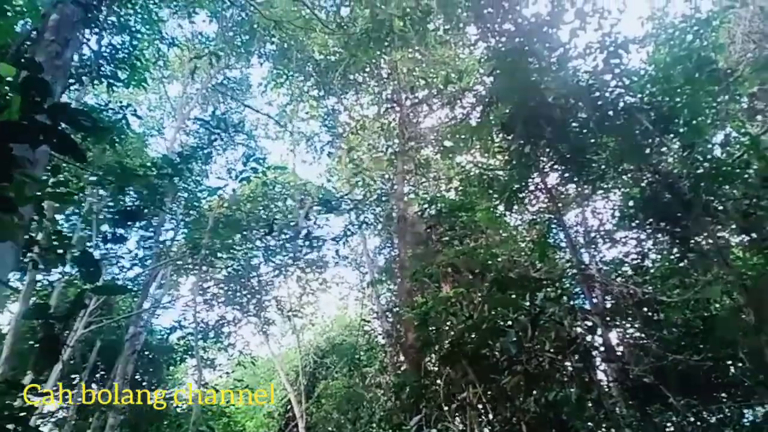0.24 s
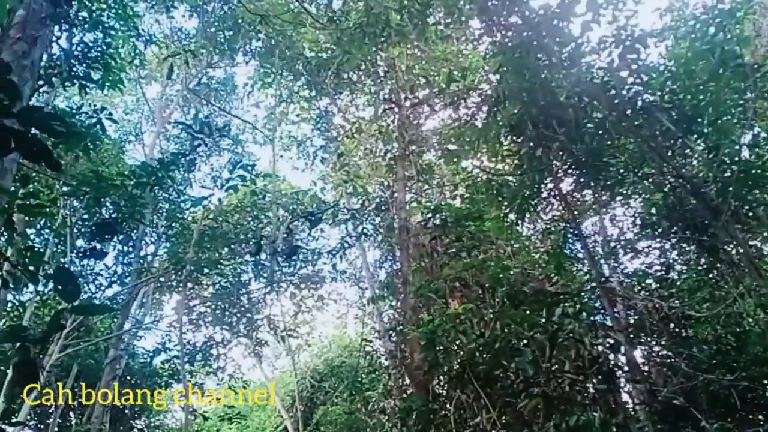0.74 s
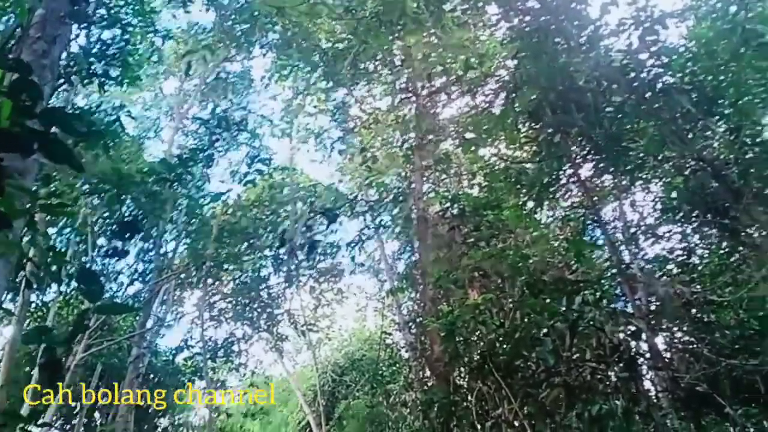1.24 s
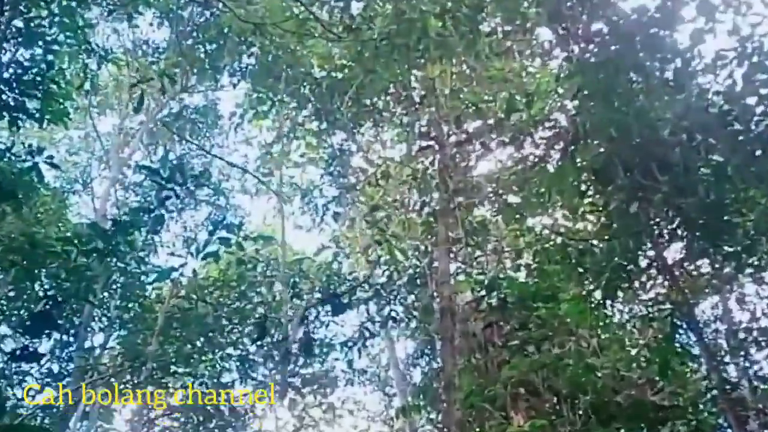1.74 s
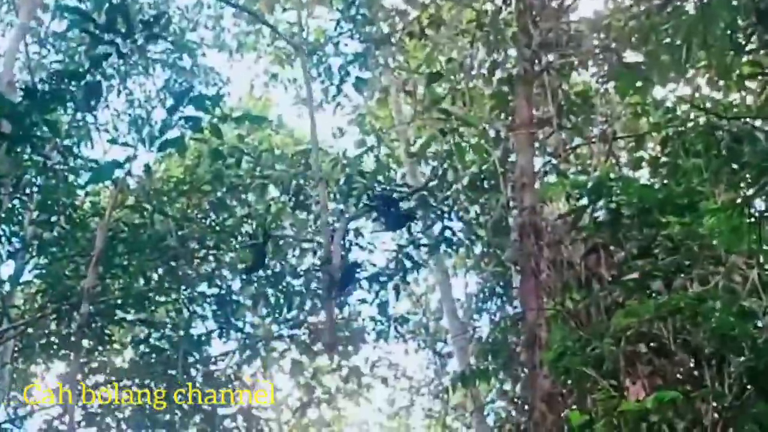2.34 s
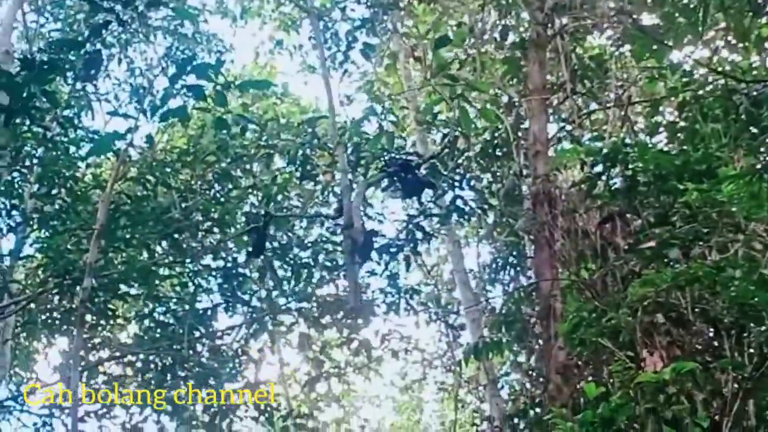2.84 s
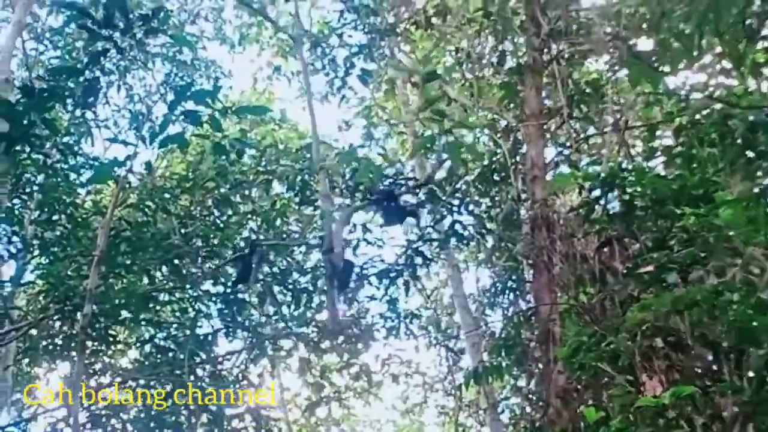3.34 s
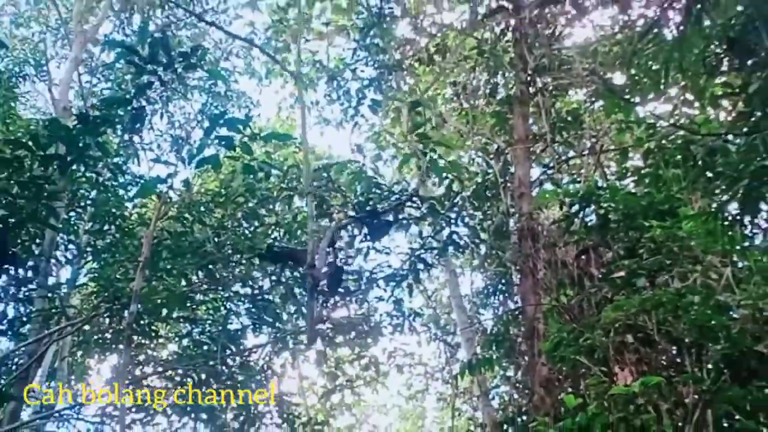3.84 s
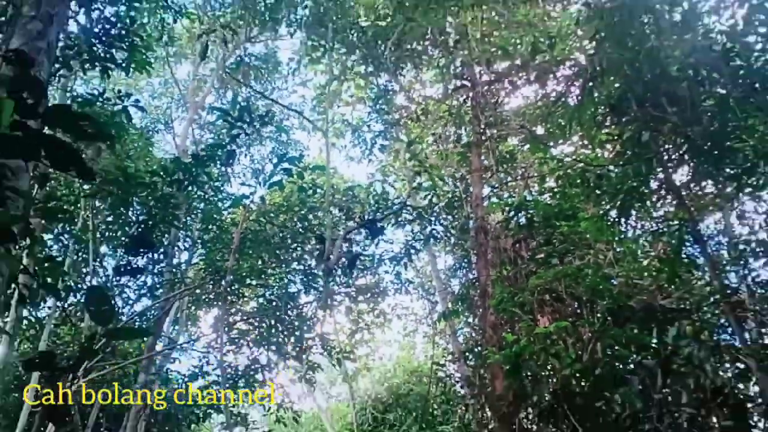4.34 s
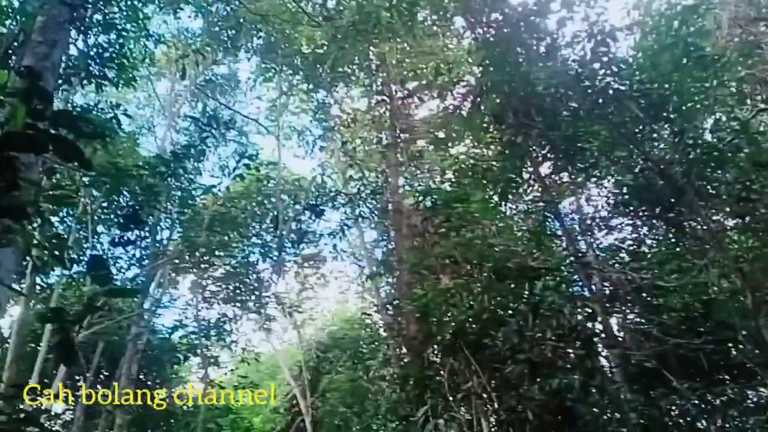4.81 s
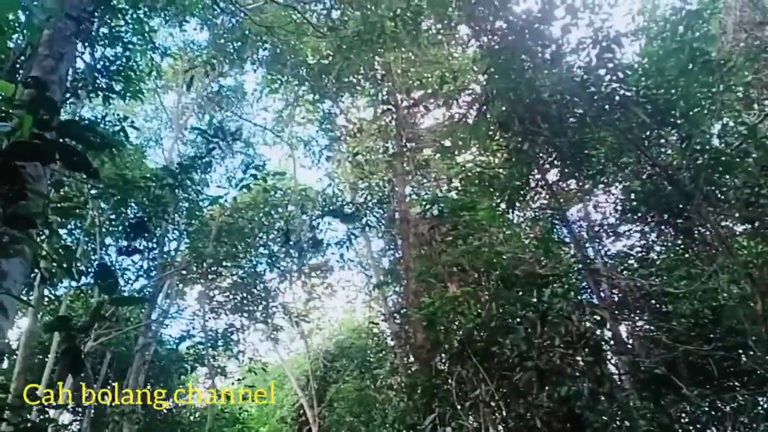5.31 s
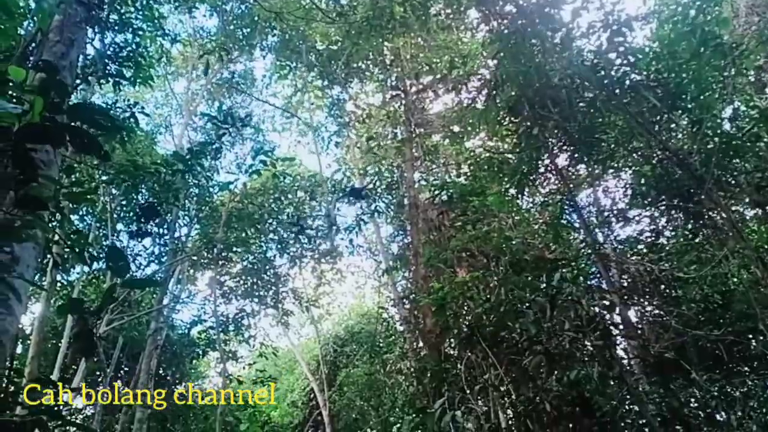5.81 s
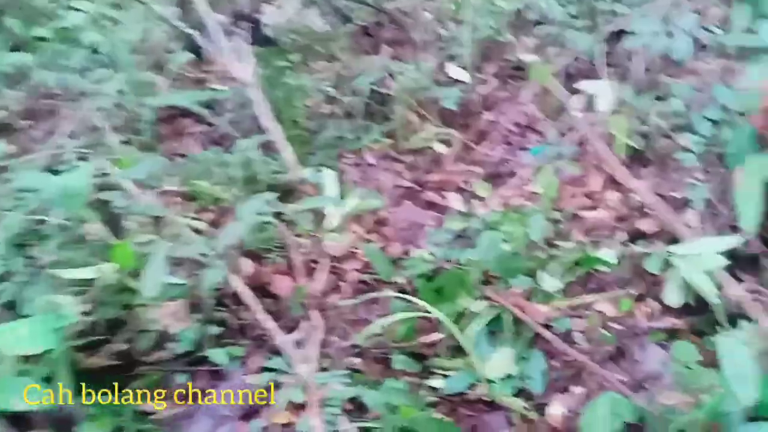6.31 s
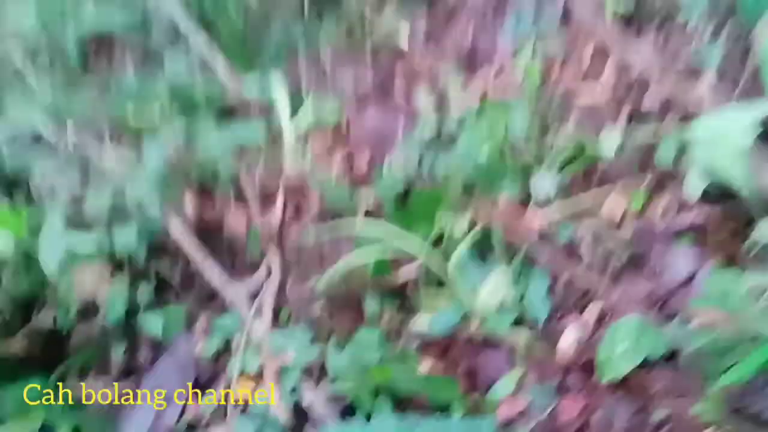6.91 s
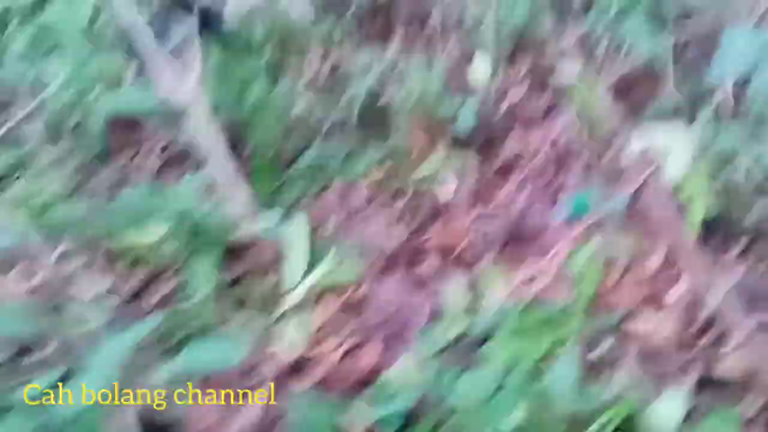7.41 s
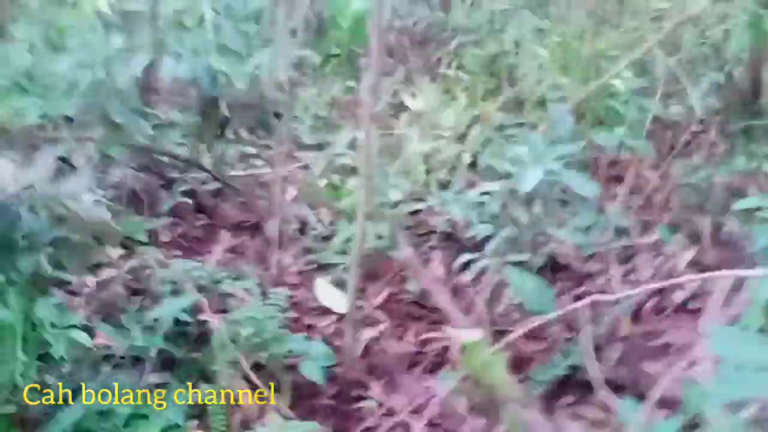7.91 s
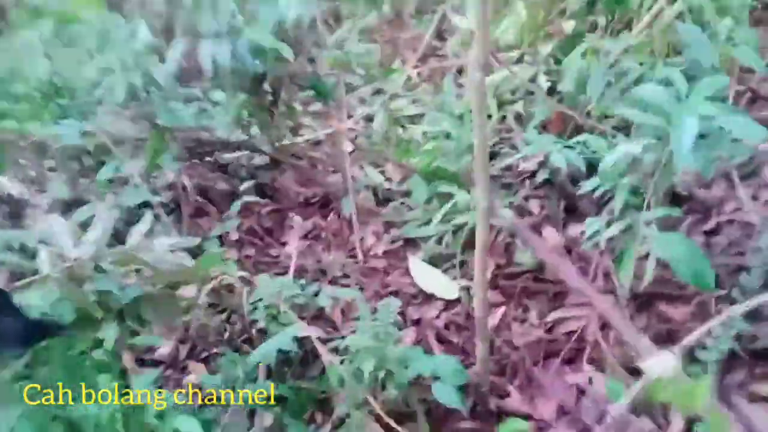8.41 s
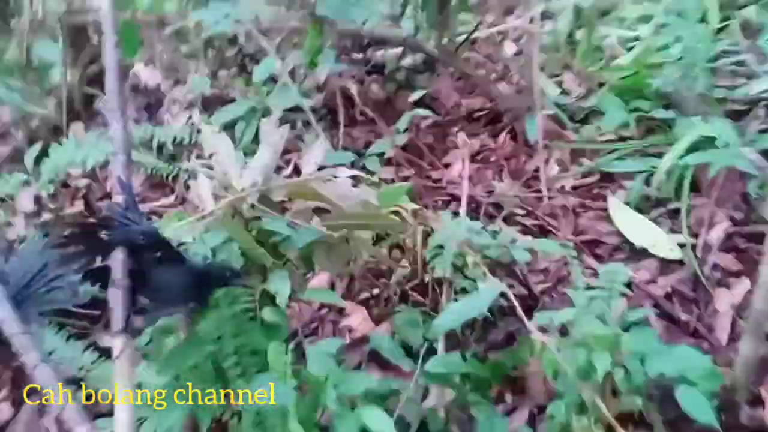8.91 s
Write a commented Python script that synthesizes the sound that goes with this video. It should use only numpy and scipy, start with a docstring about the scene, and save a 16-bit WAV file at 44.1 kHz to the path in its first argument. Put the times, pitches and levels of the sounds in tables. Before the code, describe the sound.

Hand-held outdoor stereo sound among trees: steady faint insect buzz, distant chirping rasps blurred by echo, and hard finger taps on the device. Two harsh, rattling bird calls slide downward, the second longer and opened by a low chip. Then the birds stop, and rustling, scuffing and snapping knocks dominate to the end.

```python
"""Drongo in a forest canopy

A drongo rasps twice, its whistle shaken quickly in pitch, over throbbing insect noise and a far murmur.
Far off, faint falling rasps arrive with a louder echo, and a clear whistler sings thin pure notes.
A hand-held phone with two microphone ports hears it all: taps ring its case as decaying modes,
and scuffs, leaves and the hand on the case are swells of grainy or rumbling noise."""
import sys
import numpy as np
from scipy import signal
from scipy.fft import rfft, irfft, next_fast_len
from scipy.io import wavfile
from scipy.ndimage import map_coordinates

SR = 44100
rng = np.random.default_rng(int(sys.argv[2]) if len(sys.argv) > 2 else 0)


def master(y):
    """Save y as 16-bit WAV."""
    cut = np.clip(np.atleast_2d(y).T, -1, 1)
    pcm = np.round(cut * 32767)  # scale
    wavfile.write(sys.argv[1], SR, pcm.astype(np.int16))


N = 403515  # length in samples


def amp(db):
    """Gain of a level in dB."""
    return 10 ** (np.asarray(db) / 20)


def unit(x):
    """Scaled to rms 1 over all channels together."""
    return x / np.sqrt(np.mean(x ** 2) + 1e-20)


def along(points, hz):
    """Interpolates (Hz, value) points on a log frequency axis."""
    f, v = np.transpose(points)
    return np.interp(np.log(hz + 1), np.log(f + 1), v)


def curves(rows):
    """One value per sample for each column after the time."""
    s, *cols = np.transpose(rows)
    return [np.interp(np.arange(N) / SR, s, c) for c in cols]


def note_curves(rows):
    """First and last sample of a drawn note, with its pitch in Hz and level in dB between them."""
    first, last = round(rows[0][0] * SR), round(rows[-1][0] * SR)
    hz, db = (curve[first:last] for curve in curves(rows))
    return first, last, hz, db


def wobble(rate, size=N):
    """A smooth random curve, rate knots a second."""
    knots = rng.standard_normal(size // 20 + 4)
    return map_coordinates(knots, [np.arange(size) * min(rate / SR, 1 / 20)])


def filtered(x, response):
    """x times a response of frequency."""
    m = next_fast_len(N + SR // 2)
    return irfft(rfft(x, m) * response(np.fft.rfftfreq(m, 1 / SR)), m)[..., :N]


def pair(alike):
    """Two noises whose correlation is alike: each mixes the same two sources by an angle."""
    a, b = rng.standard_normal((2, N))
    turn = np.arccos(np.clip(alike, 0, 1)) / 2
    shared, opposed = np.cos(turn) * a, np.sin(turn) * b
    return np.array([shared + opposed, shared - opposed])


def coloured(x, spectrum):
    """x shaped by a (Hz, dB) spectrum, rms 1."""
    return unit(filtered(x, lambda hz: amp(along(spectrum, hz))))


def add(voice, s, sound):
    """Mixes a sound in at its time in seconds."""
    voice[round(s * SR):][:len(sound)] += sound


def strokes(rows):
    """Bell-shaped swells; each width is split between the spread of the rise and that of the fall."""
    rise_share = .45
    out = np.zeros(N + SR)
    t = np.arange(-SR // 4, SR // 2) / SR
    for s, db, width in rows:
        spread = width * np.where(t < 0, rise_share, 1 - rise_share)
        add(out, s - 1 / 4, amp(db) * np.exp(-.5 * (t / spread) ** 2))
    return out[:N]


def ports(x, share):
    """The left port faces the trees and hears more treble; share scales the difference."""
    # left minus right: f/Hz, level/dB
    port_tilt = [(60, -3), (180, 2), (550, -2), (1650, 12), (4970, 7.5), (15000, 20.5)]
    return filtered(x, lambda hz: amp(share * np.outer([.5, -.5], along(port_tilt, hz))))


def trees(x):
    """Echoes off trunks and leaves: decaying noise, a fresh pattern for each quarter second of sound."""
    # decay of the echo: f/Hz, t60/s
    decay = [(1000, 0.49), (3000, 0.66), (12000, 0.63)]
    out, step = np.zeros((2, N + 2 * SR)), SR // 4
    for start in range(0, N, step):
        dry_part = x[start:start + step]
        if np.any(dry_part):
            hz, t, z = signal.stft(rng.standard_normal((2, SR * 3 // 4)), SR, nperseg=256)
            fading = z * amp(-60 * t / along(decay, hz)[:, None])
            tail = signal.istft(fading, SR, nperseg=256)[1]
            wet = signal.fftconvolve(dry_part[None], tail / np.linalg.norm(tail[0]), axes=1)
            out[:, start:start + wet.shape[1]] += wet
    return out[:, :N]


def foliage(x, t60):
    """Leaves scatter the sound into many close copies, differently for each port."""
    t = np.arange(SR // 10) / SR
    sparse = rng.standard_normal((2, len(t))) * (rng.random((2, len(t))) < .03)
    copies = sparse * amp(-60 * t / t60)
    copies = copies / np.linalg.norm(copies, axis=1, keepdims=True)
    return signal.fftconvolve(x[None], copies, axes=1)[:, :N]


def syrinx(hz, depth, overtone_db, size):
    """A whistle flung between high and low pitch about 92 times a second: deeper shake, harsher rasp."""
    # overtones of the whistle: multiple of the pitch, level/dB relative to overtone_db
    overtones = [(.5, -14.5), (1.5, -1), (2, 1), (3, -6.5), (4, -5.5)]
    beat = 2 * np.pi * np.cumsum(92 * (1 + 0.3 * wobble(60, size=size))) / SR
    # tanh squares the swing off, so the pitch dwells at either end
    swing = np.tanh(.7 * np.sin(beat + .6 * np.cos(beat)) + .45 * wobble(300, size=size))
    shake = 1.9 * swing + .25 * wobble(1300, size=size)
    phase = 2 * np.pi * np.cumsum(hz * (1 + depth * shake)) / SR
    # half multiples sound where the harsh voice weakens every second cycle
    harshness = np.clip(depth / 0.29, 0, 1)
    tone = np.sin(phase)
    for multiple, db in overtones:
        share = harshness if multiple % 1 else 1
        tone = tone + amp(overtone_db + db) * share * np.sin(multiple * phase)
    # loudest while the pitch falls
    stutter = 22 * np.tanh(wobble(250, size=size)) - 5 * np.cos(beat)
    return np.sqrt(2) * tone * amp(depth * stutter)


def glide(db, first_hz, last_hz, length, depth, overtone_db, sharp):
    """One short note of the syrinx sliding down under an arch."""
    u = np.linspace(0, 1, round(length * SR))
    arch = np.abs(np.sin(np.pi * u)) ** sharp
    hz = first_hz + (last_hz - first_hz) * u
    return amp(db) * arch * syrinx(hz, depth, overtone_db, size=len(u))


def buzz(bands, rate_hz, depth, alike):
    """Groups of insects: resonant noise throbbing at their pulse rate, each group swelling on its own."""
    out = 0
    for centre, width, db in bands:
        pulse = 2 * np.pi * np.cumsum(rate_hz * (1 + 0.0278 * wobble(3.4))) / SR
        throb = 1 + depth * np.sin(pulse)
        swell = amp(db + 2.9 * wobble(1.15) + 1.4 * wobble(18))
        noise = pair(alike) * throb
        out = out + swell * filtered(noise, lambda f: 1 / (1 + (2 * (f - centre) / width) ** 2))
    return unit(out)


def forest():
    """Insect choruses and a steady high hiss over a far murmur, all of filtered noise."""
    # chorus levels ahead of the port colour: t/s, high level/dB, low level/dB
    chorus = [(0.0, -60, -72), (6.12, -59, -70.5), (6.19, -58, -71), (9.15, -61, -69.5)]
    # resonances of the insect groups: f/Hz, width/Hz, relative level/dB
    high_bands = [(7130, 560, 4), (7703, 170, 5.5), (7600, 580, -30), (8586, 580, 0)]
    low_bands = [(5440, 220, -4), (5790, 170, -1.5)]
    # spectrum of the highest insects: f/Hz, relative level/dB
    hiss = [(5470, -33), (9300, -23), (9820, -13), (11200, 3), (12200, -1), (13500, 1.5), (14900, 1),
            (15600, -1.5)]
    # spectrum of the far forest murmur: f/Hz, relative level/dB
    air = [(18, -12), (30, 0.5), (262, -5), (360, -5), (400, -4), (599, -3.5), (1060, -10), (2880, -9.5),
           (3570, -18), (4800, -21.5), (6240, -20), (10600, -120)]
    high_db, low_db = curves(chorus)
    insects = amp(high_db) * buzz(high_bands, rate_hz=141, depth=0.061, alike=0.41)
    insects = insects + amp(low_db) * buzz(low_bands, rate_hz=100, depth=0.23, alike=0.27)
    insects = insects + amp(-69.5) * coloured(pair(0.53), hiss)
    murmur = amp(-57.5 + wobble(3.64)) * coloured(pair(0.094), air)
    return ports(insects, share=0.55) + murmur


def whistler():
    """A far, clear whistler: two thin pure notes with their echo."""
    # pitch and level along each note, ahead of the echo: t/s, f/Hz, level/dB
    notes = [
        [(.062, 2730, -63), (.075, 2720, -62), (.16, 2587, -63.5), (.22, 2664, -59), (.262, 3020, -61.5),
         (.275, 3040, -75)],
        [(.288, 2400, -70), (.3, 2384, -61), (.335, 2320, -61), (.35, 2310, -70)],
    ]
    voice = np.zeros(N)
    for rows in notes:
        first, last, hz, db = note_curves(rows)
        voice[first:last] += np.sqrt(2) * amp(db) * np.sin(2 * np.pi * np.cumsum(hz) / SR)
    return voice + amp(2) * trees(voice)


def far_birds():
    """Falling rasps, almost all fundamental, blurred by an echo stronger than the direct sound."""
    # one rasp a row, ahead of the echo: t/s, level/dB, length/s
    rasps = [(.738, -56, 0.036), (0.877, -57, .052), (1.031, -61, .1), (1.195, -58, 0.11),
             (1.372, -53.5, .065), (1.493, -57.5, 0.16), (1.688, -51.5, 0.065), (1.87, -53, .077),
             (2.058, -51, 0.089), (2.25, -51.5, 0.09), (2.454, -51.5, 0.085)]
    voice = np.zeros(N)
    for s, db, length in rasps:
        rasp = glide(db, first_hz=2636, last_hz=2148, length=length, depth=0.0758, overtone_db=-55, sharp=0.52)
        add(voice, s, rasp)
    return voice + amp(6.0) * trees(voice)


def grip():
    """The hand shifting and the palm rubbing: low lumpy noise that the case carries to both ports."""
    # rumble of the shifting hand, ahead of the port balance: t/s, level/dB
    shifting = [(0.0, -65), (0.51, -72), (1.12, -69), (1.38, -47.5), (2.11, -64.5), (3.0, -67), (4.38, -52),
                (4.64, -66.5), (5.83, -70), (6.24, -56), (6.45, -59), (8.66, -62.5), (9.15, -69.5)]
    # the palm rubbing along the case, ahead of the port balance: t/s, level/dB, width/s
    rubs = [(1.33, -51.5, 0.058), (1.54, -48, 0.15), (1.91, -54.5, 0.086), (3.36, -61, .048),
            (4.19, -54, 0.077), (4.27, -58.5, 0.15), (4.505, -38, 0.052), (5.555, -51, 0.018),
            (6.61, -52.5, .026)]
    # spectra of the rumble and of the rubbing: f/Hz, relative level/dB
    rumble = [(25, -38), (50, -5), (85, 0.5), (160, -6.5), (300, -17.5), (600, -49)]
    rubbed = [(150, -15), (280, -1.5), (480, 4.5), (900, -9.5), (1400, -20.5), (3000, -45)]
    lumps = pair(.8) * amp(3 * wobble(60))
    shifts = amp(curves(shifting)[0]) * coloured(lumps, rumble)
    rubbing = strokes(rubs) * coloured(lumps, rubbed)
    return (shifts + rubbing) * amp([[-1.5], [1.5]])  # left, right


def brushing():
    """Leaves and cloth: fine friction grains in the case's resonances; scuffs are short strokes of it."""
    # leaves and cloth, ahead of the port colour: t/s, level/dB, treble boost/dB
    brush = [(6.3, -58.5, -28), (6.65, -56.5, 7.5), (7.05, -42.5, 1.5), (7.25, -54, 9), (7.85, -51.5, 7),
             (8.87, -47.5, 8.5), (9.15, -56, 5)]
    # quick scuffs on the case, ahead of the port colour: t/s, level/dB, width/s
    scuffs = [(4.961, -39, 0.01), (6.89, -34, 0.047), (6.938, -45, 0.028), (7.005, -47.5, 0.028),
              (7.442, -32.5, 0.023), (7.8, -42.5, 0.045), (7.848, -39, 0.071), (7.959, -42, 0.054),
              (8.077, -37.5, 0.024), (8.144, -37.5, 0.0091), (8.172, -39.5, 0.0083), (8.291, -47, 0.01),
              (8.355, -39.5, 0.0059), (8.487, -30, 0.0038), (8.632, -46, 0.061), (8.675, -39, 0.043)]
    # spectrum of the friction: f/Hz, relative level/dB
    brushed = [(120, -12), (220, -8), (480, -3), (650, -0.5), (880, -0.5), (1400, -11), (1900, -6),
               (2500, -2.5), (3000, -13.5), (3500, -21.5), (5700, -30), (7500, -35.5), (13600, -43.5),
               (15500, -65)]
    db, bright_db = curves(brush)
    fade_in = np.clip((np.arange(N) / SR - brush[0][0]) / 0.018, 0, 1)
    stroke = amp(db) * fade_in + strokes(scuffs)
    crackle = 1 + 3 * (rng.random(N) < .004)  # sparse louder samples
    grains = coloured(pair(.6) * crackle * amp(2.8 * wobble(250) + wobble(35)), brushed)
    body = filtered(grains, lambda hz: 1 / (1 + (hz / 1400) ** 4))
    treble = filtered(grains, lambda hz: 1 / (1 + (3300 / (hz + 1)) ** 4))
    crunch = amp(3.8 * wobble(12)) - 1  # the low resonance comes and goes with the pressure of the hand
    friction = grains + crunch * body + (amp(bright_db) - 1) * treble
    return ports(stroke * friction, share=0.95)


def taps():
    """Finger taps: a thump rings the two low case modes, a knock the next two, a snap the top and a crack."""
    # relative strengths; a tip favours the lower of two modes:
    # t/s, thump level/dB, thump tip/dB, knock level/dB, knock tip/dB, snap level/dB
    hits = [(0.1017, -21, -1, -28, -5, -35.5), (0.2637, -45, 2.5, -59, -3, -60),
            (0.349, -72, 3, -67, -6, -49.5), (.8918, -52, 1, -27.5, -2.5, -25.5),
            (1.2312, -11, -2, -16.5, 1, -33), (1.2452, -13, 0, -29.5, 1.5, -33),
            (1.2766, -25, -5, -34, 4.5, -35), (3.851, -34, 6.5, -37.5, 2, -58),
            (3.901, -41, 1, -50, 3, -55), (3.9948, -56, 2, -55, 3.5, -47), (4.4294, -52, 9, -59, 0, -47.5),
            (4.5524, -37, 1, -40, 3.5, -46), (4.5628, -36, 2.5, -46, 0, -46.5),
            (4.6948, -62, -5, -56, -4, -56), (5.9581, -48, -6.5, -50.5, 5.5, -60),
            (6.0596, -27.5, 0, -36, -3, -31.5), (6.2739, -23, 1.5, -28.5, -2.5, -25.5),
            (6.4034, -46, -8.5, -29, -4, -44), (6.4184, -37.5, -1.5, -32, -3, -42),
            (6.841, -57, 2, -38, 0, -59), (6.8494, -52, -5, -32, -3, -50),
            (7.0664, -42.5, 6.5, -39.5, 1, -58), (7.213, -58.5, -10, -55.5, -12, -39),
            (7.385, -47, 6, -31, -6.5, -26.5), (7.5331, -42, -10, -17.5, 3, -11.5),
            (7.555, -40.5, -8, -29.5, 1, -27), (8.502, -22, 10, -33, 7, -28.5),
            (8.5768, -17, 6.5, -31, -0.5, -18.5)]
    # case modes: f/Hz, t60/s, left level/dB, right level/dB
    case_modes = [(137, 0.044, -17.5, -6.5), (236, 0.011, 3.5, 6.5), (480, 0.031, -4, 2.5),
                  (1058, 0.0087, 10, -2), (1933, 0.0028, 16, 13.5)]
    mode_scatter_db, detune_db = 1.1, 0.51  # chance of where the finger lands; pitch chance as 20 log10
    out, t = np.zeros((2, N + SR)), np.arange(SR // 8) / SR
    late = np.maximum(t - np.array([[0], [.00042]]), 0)  # the bending wave reaches the right port later
    soft = 1 - np.exp(-late / 0.00065)  # a fingertip takes a moment to press
    dull = signal.butter(2, [1900, 4300], "bandpass", fs=SR)
    for s, thump_db, thump_tip_db, knock_db, knock_tip_db, snap_db in hits:
        thump_levels = thump_db + thump_tip_db, thump_db - thump_tip_db
        knock_levels = knock_db + knock_tip_db, knock_db - knock_tip_db
        levels = *thump_levels, *knock_levels, snap_db
        ring = 0
        for (hz, t60, left_db, right_db), db in zip(case_modes, levels):
            port_db = np.array([[left_db], [right_db]])
            decay = amp(db + mode_scatter_db * rng.normal() + port_db - 60 * late / t60)
            ring = ring + decay * np.sin(2 * np.pi * hz * amp(rng.normal(0, detune_db)) * late)
        crack_db = snap_db - 1 + np.array([[12], [6]]) - 60 * t / 0.007
        crack = amp(crack_db) * rng.standard_normal((2, len(t)))
        out[:, round(s * SR):][:, :len(t)] += amp(13) * soft * ring + signal.lfilter(*dull, crack)
    return out[:, :N]


def near_bird():
    """The drongo's rasps and two low notes: direct sound, scatter in the leaves and the forest's answer."""
    # rasping notes, ahead of throat and forest: t/s, f/Hz, level/dB
    notes = [
        [(3.553, 3520, -53), (3.572, 5150, -55), (3.6, 4640, -28.5), (3.645, 3080, -26.5), (3.67, 2913, -31),
         (3.69, 3557, -26.5), (3.75, 2960, -29.5), (3.8, 3096, -41.5), (3.828, 3080, -48)],
        [(3.828, 2900, -50), (3.84, 2745, -29), (3.865, 2701, -28), (3.895, 2907, -32.5), (3.92, 2800, -55)],
        [(5.42, 4160, -59), (5.44, 5240, -48.5), (5.5, 5700, -48), (5.53, 5960, -32), (5.56, 5300, -45),
         (5.6, 4604, -34), (5.625, 4060, -26.5), (5.67, 4240, -26), (5.7, 3634, -28), (5.78, 3597, -30.5),
         (5.84, 3243, -25.5), (5.885, 3066, -27), (5.92, 3287, -29), (5.97, 2900, -27.5), (6.01, 2460, -47)],
        [(6.055, 2780, -42), (6.066, 2785, -32.5), (6.105, 2630, -30.5), (6.13, 2210, -39.5), (6.15, 1900, -47)],
    ]
    # low notes, a half-pitch undertone under the first rasp and a chip before the second,
    # ahead of throat and forest: t/s, level/dB, first f/Hz, last f/Hz, length/s
    low_notes = [(3.608, -43, 2300, 1820, 0.0465), (5.395, -24.5, 2165, 1382, 0.0356)]
    # colour of the throat: f/Hz, level/dB
    throat = [(1000, 6), (1700, -1), (2600, 4), (3900, -2), (5000, -2), (7000, -2), (9800, -8),
              (11500, -5.5), (13500, -6), (15000, -42)]
    clear_hz, harsh_hz, harsh_depth = 5206, 2957, .21  # depth as a share of the pitch
    voice = np.zeros(N)
    for rows in notes:
        first, last, hz, db = note_curves(rows)
        # the flutter deepens as the pitch sinks from the top of the note, and stays deep
        since_top = np.where(np.arange(last - first) < hz.argmax(), hz.max(), hz)
        lowest = np.minimum.accumulate(since_top)
        depth = harsh_depth * np.clip((clear_hz - lowest) / (clear_hz - harsh_hz), .35, 1) ** 2.2
        # overtones fade less than the fundamental
        overtone_db = -12.5 + 0.42 * np.clip(-27 - db, -5, 15)
        voice[first:last] += amp(db) * syrinx(hz, depth, overtone_db, size=last - first)
    for s, *low_note in low_notes:
        add(voice, s, glide(*low_note, depth=0.042, overtone_db=-29, sharp=1.06))
    sounding = np.abs(voice) > 0  # keeps the filter from smearing into the silences
    voice = filtered(voice, lambda hz: amp(along(throat, hz))) * sounding
    heard = amp(-5) * voice + amp(-3.5) * foliage(voice, t60=.04) + amp(-8) * trees(voice)
    return ports(heard, share=.65)


def scene():
    """Everything at the two ports."""
    birds = whistler() + far_birds() + near_bird()
    handling = grip() + brushing() + taps()
    return forest() + birds + handling


def record(dry):
    """The microphones lose deep bass; the converter adds a small offset, clips and cuts off the top."""
    bass_hz, offset, top_hz = 60, .002, 15600

    def microphone(hz):
        """Second-order high-pass."""
        s = 1j * hz / bass_hz
        return s ** 2 / (1 + 1.4 * s + s ** 2)

    heard = filtered(dry, microphone)
    return filtered(np.clip(heard + offset, -1, 1), lambda hz: hz < top_hz)


dry = scene()
out = record(dry)
master(out)
```